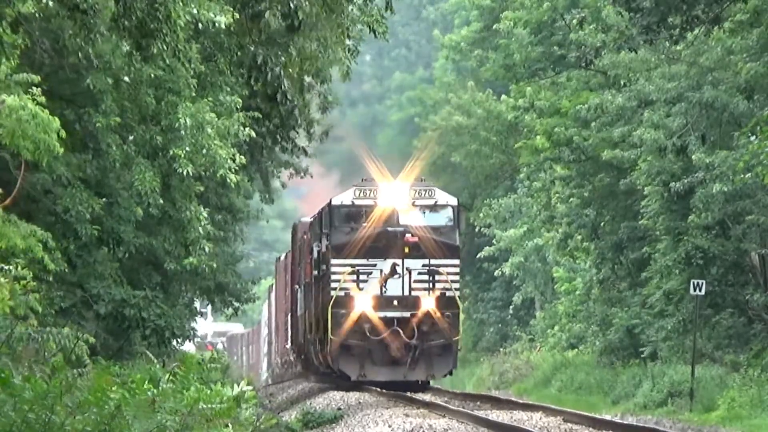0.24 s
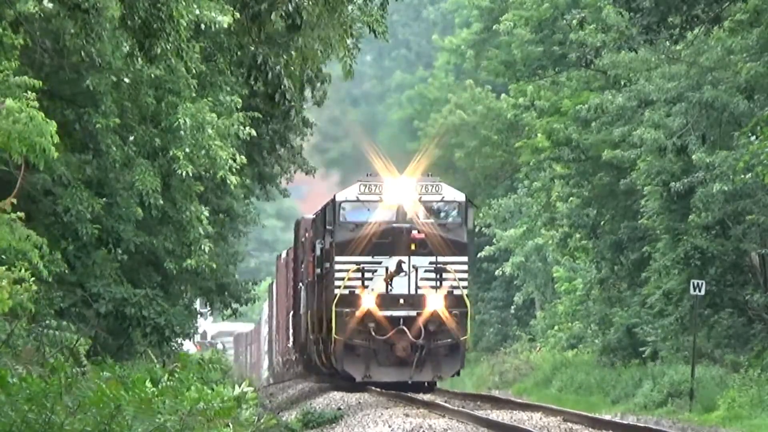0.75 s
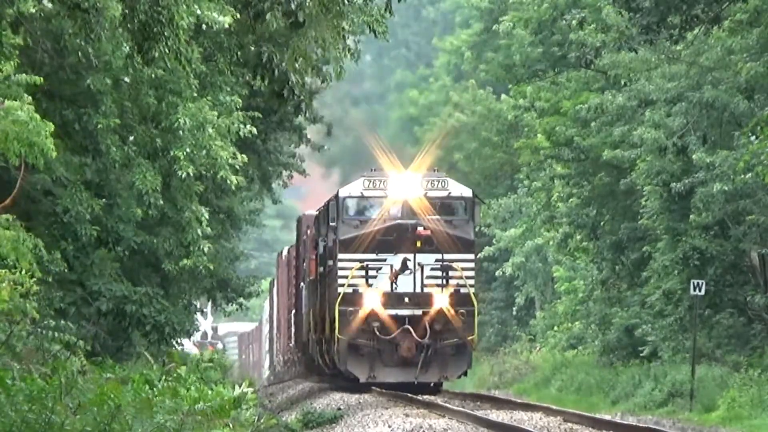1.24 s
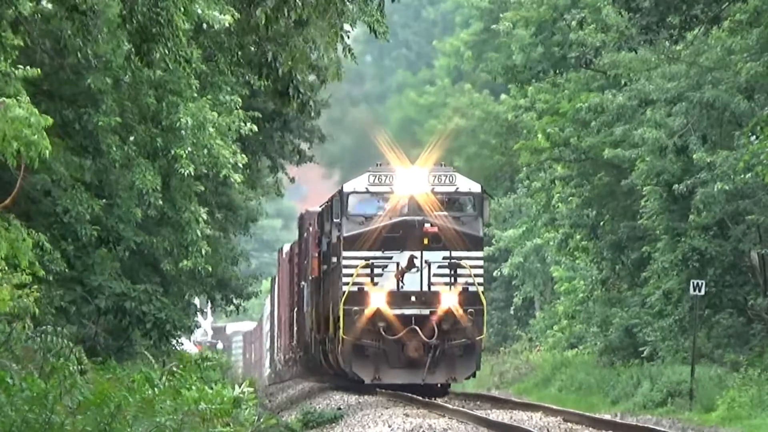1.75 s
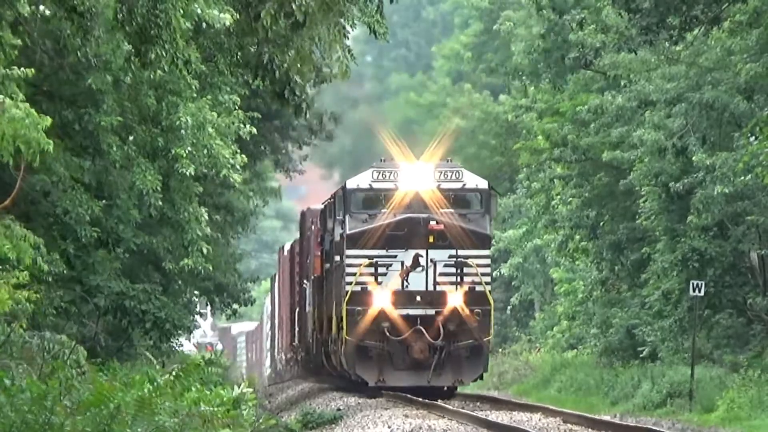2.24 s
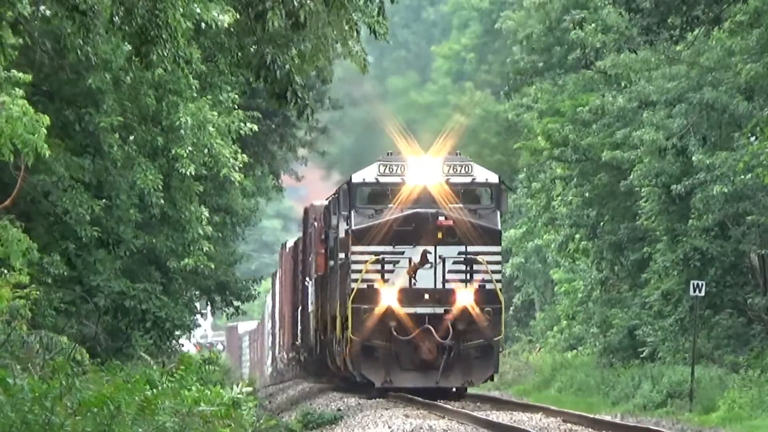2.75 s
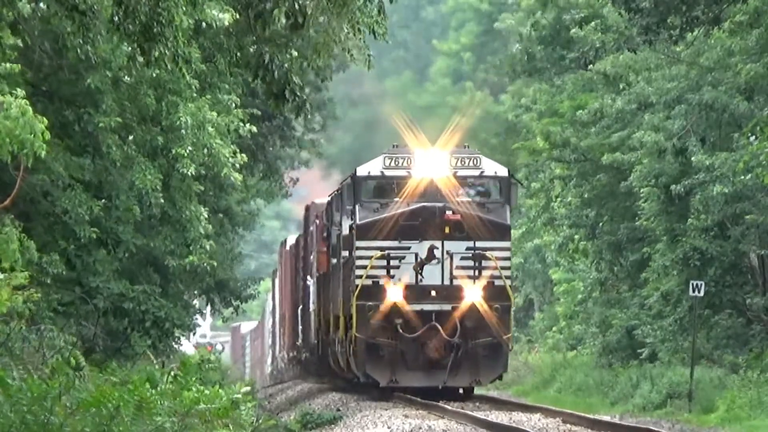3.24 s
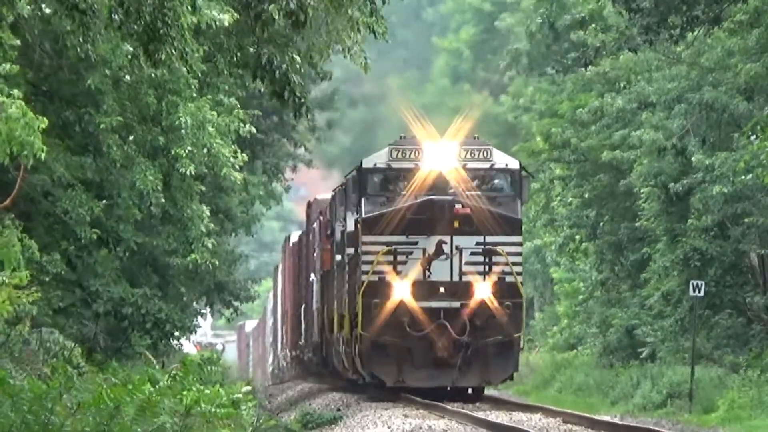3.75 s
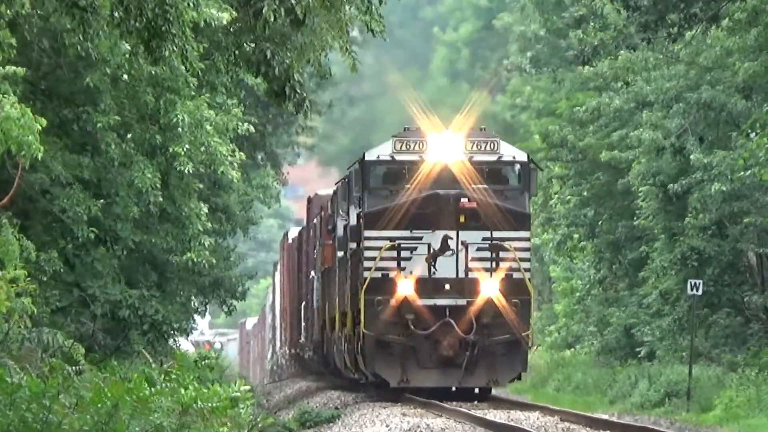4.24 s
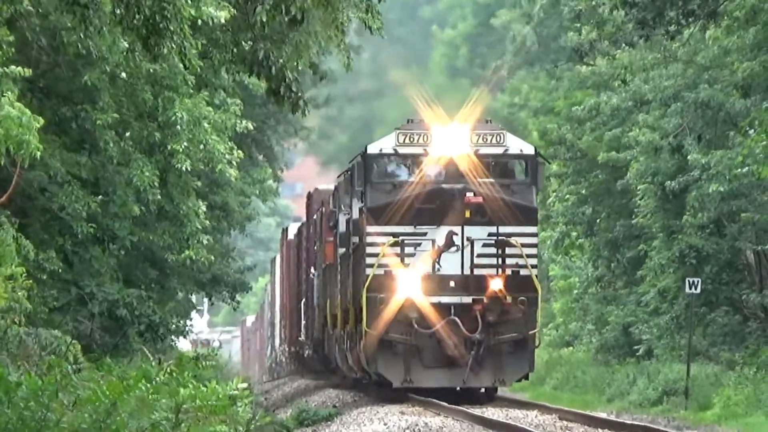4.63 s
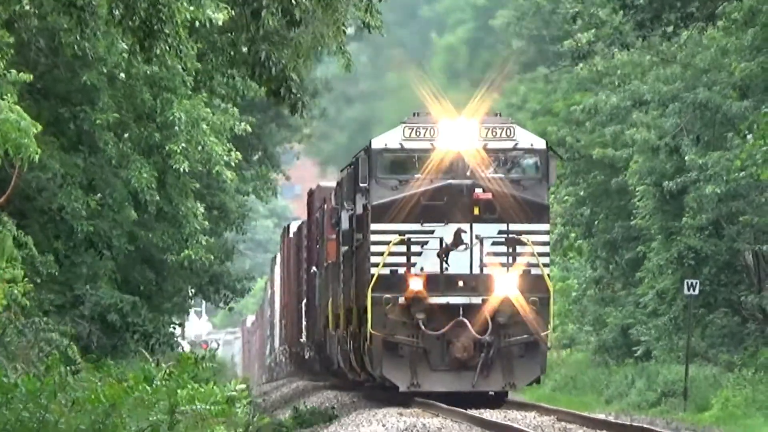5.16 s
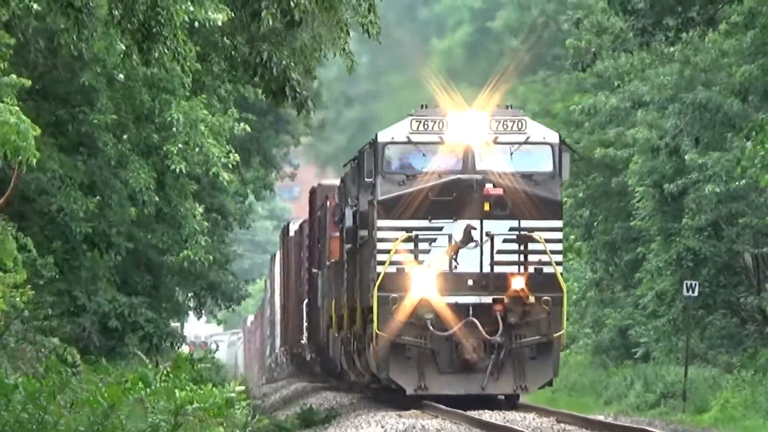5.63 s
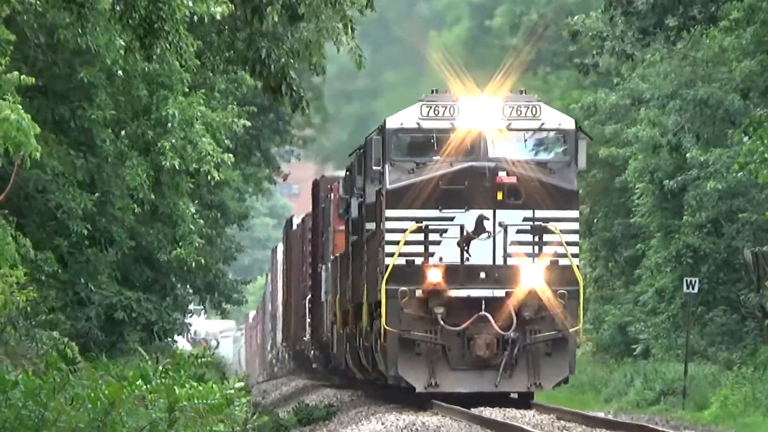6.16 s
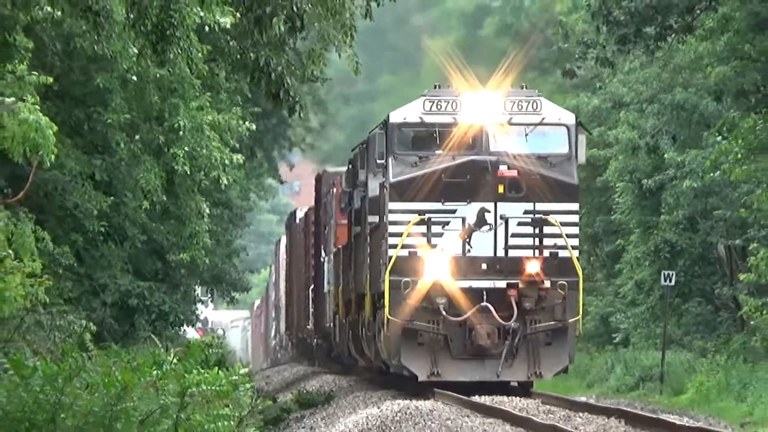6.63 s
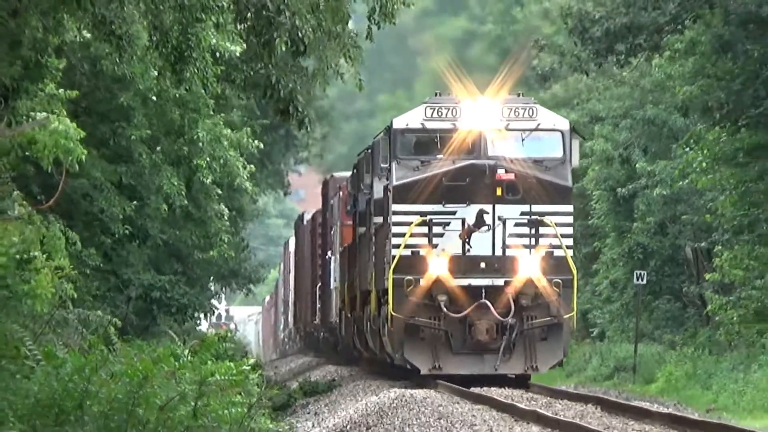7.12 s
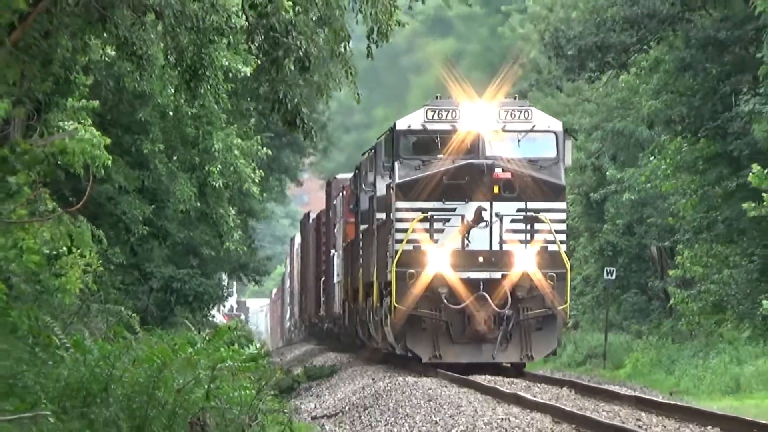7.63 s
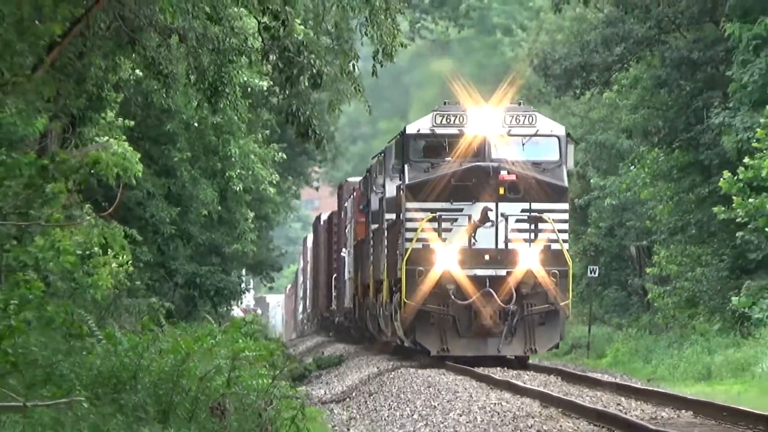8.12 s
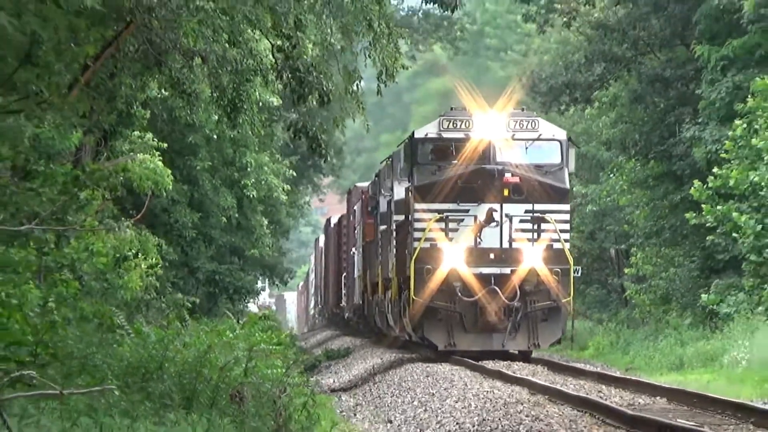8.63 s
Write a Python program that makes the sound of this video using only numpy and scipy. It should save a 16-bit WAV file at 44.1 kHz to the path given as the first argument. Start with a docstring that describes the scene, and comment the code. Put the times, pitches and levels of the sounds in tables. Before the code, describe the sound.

A diesel freight train approaches along a wooded line, its engine throbbing in a deep drone under the roar of exhaust and fans. Early on, a few small birds chirp faintly and an air valve spits twice. The exhaust growl then swells now and then, and about halfway the wheels hiss brighter on the rails. The sound keeps growing louder toward a stereo microphone facing the train.

```python
"""A wooded railway line, a stereo microphone facing a diesel freight train 186 m off and closing.
From the start the loaded engine throbs in a deep drone while its stack and fans roar. In the first
seconds a few small birds call from the trees, and an air valve spits twice. From about 3 s the
exhaust's growl swells now and then. Near 5 s the train comes clear of the trees and the wheels hiss
brighter on the rails; at the end it is about 60 m from the microphone."""
import sys
import numpy as np
from scipy import signal
from scipy.fft import rfft, irfft, next_fast_len
from scipy.io import wavfile
from scipy.ndimage import uniform_filter1d, map_coordinates

SR = 44100
rng = np.random.default_rng(int(sys.argv[2]) if len(sys.argv) > 2 else 0)


def log_audio(samples):
    """Write samples as a 16-bit WAV file to the path given in sys.argv[1]."""
    # one column per channel
    frames = np.atleast_2d(samples).T
    # limit to full scale, then quantise
    limited = np.clip(frames, -1, 1)
    pcm = np.round(limited * 32767).astype(np.int16)
    wavfile.write(sys.argv[1], SR, pcm)


N = 391608

# exhaust lines at orders 5 to 29 of the engine cycle: (level within their range [dB])
EXHAUST_ORDERS = [-26, -17, -45, -24, -12, -17.5, -11, 0, -9, -13.5, 0, -13.5, -41, -16.5, -22.5, -24, -27,
                  -23, -30, -26, -12, -10.5, -3.5, -6.5, -8.5]
# swells of the growl above the drone: (peak time [s], length [s], boost [dB])
GROWL_SWELLS = [(3.3, .65, 7), (4.45, .8, 3), (6.25, 1.0, 5), (7.9, .65, 4.5), (8.65, .5, 2.5)]
# noise of the stack, the fans and the wheels on the rails: (frequency [Hz], relative density [dB])
STACK_SPECTRUM = [(15, -18), (26, -5), (60, 2), (105, 7), (150, -2), (215, 0), (300, -3), (420, -3.5),
                  (540, -3), (720, -9.5), (1100, -19), (2500, -44), (6000, -80)]
FAN_SPECTRUM = [(250, -28), (600, -7.5), (850, -1.5), (1100, -2), (1700, -2.5), (2100, -4.5), (3000, -7.5),
                (4200, -13.5), (5400, -23), (6200, -32), (9000, -50)]
RAIL_SPECTRUM = [(800, -25), (2200, -4.5), (3600, 1.5), (4600, -1), (5500, -3), (6100, -12), (6800, -13),
                 (7600, -11.5), (8200, -15), (9000, -16.5), (10000, -22), (12000, -30.5), (15000, -45)]
# resonances and hollows of the locomotive's body: (centre [Hz], width [Hz], gain [dB])
BODY_RESONANCES = [(532, 23, 2.5), (777, 17, -2), (873, 45, 4.5), (1075, 14, 3), (1130, 34, -3.5),
                   (1360, 120, 3.5), (1528, 38, -4.5), (1753, 84, 3.5)]
# hums of the fans and blowers: (frequency [Hz], relative level [dB])
BLOWER_HUMS = [(264, -14.5), (273, -15.5), (357, -14), (369, -13.5), (857, -19), (907, -16.5),
               (1102, -15.5)]
# air valve spits: (time [s], level [dB], time to fall 60 dB [s])
VALVE_SPITS = [(.926, -51.5, .2), (.988, -54, .26)]
# escaping compressed air: (frequency [Hz], relative density [dB])
VALVE_SPECTRUM = [(2500, -25), (5000, 0), (8000, 0), (11000, -7), (15000, -14)]
# short chirps and one sagging whistle: (time [s], start pitch [Hz], end pitch [Hz], level [dB])
BIRD_CHIRPS = [(.625, 3550, 3300, -47), (.625, 3000, 2520, -45), (.745, 2590, 3100, -45),
               (1.665, 2800, 2480, -44.5), (1.755, 2780, 2400, -43.5), (2.2, 3030, 2750, -46),
               (2.65, 3000, 3020, -44), (3.2, 4640, 4610, -47)]
BIRD_WHISTLE = (1.12, 2440, 2350, -51)
# still air and microphone hiss: (frequency [Hz], relative density [dB])
HISS_SPECTRUM = [(100, 9), (4000, 4.5), (7500, -3.5), (10000, 3), (13000, 1.5), (16000, 0)]
# faint steady whines: (frequency [Hz], level [dB])
FAINT_WHINES = [(7867, -80), (15734, -88)]
# likeness of the roar at the two microphone ports: (frequency [Hz], correlation [0-1])
STEREO_LIKENESS = [(60, 1), (140, 0.95), (250, 0.69), (500, 0.79), (1000, 0.87), (2000, 0.93), (4000, 0.94),
                   (8000, 1)]
# the train's balance at the microphone: (frequency [Hz], left minus right [dB])
LEFT_BALANCE = [(30, -7.2), (95, -6.5), (140, -6.2), (220, -1), (300, -1), (1000, 1.7), (2000, -0.5),
                (4000, 0)]
# the train's phase at the microphone: (frequency [Hz], lead of the left side [rad])
LEFT_LEAD = [(40, -0.12), (100, -0.38), (300, -0.67), (700, -0.62), (1300, -0.28), (2400, 0.25),
             (3500, 0.16), (7000, 0.046)]
# fans and rails on the approach: (start level [dB], growth with nearness [dB/dB], gain in the clear [dB])
FAN_RISE, RAIL_RISE = (-40.5, 1.12, 1.5), (-51.3, 1.12, 6.2)

START_M, SPEED_M_PER_S = 186, 14
CYCLE_HZ = 7.7728
FIRING_DB, THROB_DB, GROWL_DB = -28.6, -28.9, -43.5  # low, middle and high exhaust lines, far off
FIRING_SHARE = .3  # part of each growl swell that the firing note follows
TREBLE_HOLD_DB = 6.3  # fans and rails follow nearness only this far
CLEAR_S, CLEAR_SPREAD_S = 5.08, .24  # the train is halfway clear of the trees at CLEAR_S
CHIRP_S, WHISTLE_S = .066, .46
BAND_LIMIT_HZ = 15760


def exhaust(angle, scatter_db, fade_db):
    """Twelve unequal firings a cycle: orders 12 and 15 beat into a throb, their neighbours into a chug."""
    swell_db = growl_swell_db()
    ranges_db = FIRING_DB + FIRING_SHARE * swell_db, THROB_DB, GROWL_DB + swell_db
    firing, throb, growl = (amp(db + fade_db * wobble(2.5)) for db in ranges_db)
    drone = np.zeros(N)
    for order, db in enumerate(EXHAUST_ORDERS, start=5):
        gain = firing if order < 14 else throb if order < 24 else growl
        # the manifold delays higher orders more, smearing the blows over the cycle
        phase = order * angle - 1.165 * (order - 12) ** 2
        # paths through the trees make every line flutter, the weak ones most for their size
        stray = amp(scatter_db) * amp(db) ** .4
        scattered = stray * (wobble(6) * np.cos(phase) + wobble(6) * np.sin(phase))
        drone += gain * (amp(db) * np.cos(phase) + scattered)
    return amp(nearness_db()) * drone


def engine_angle(hunt_rad):
    """Angle of the engine cycle in radians; the governor hunts a little."""
    return 2 * np.pi * CYCLE_HZ * (clock() - .034) + hunt_rad * wobble(2.5)


def exhaust_puffs(angle, uneven_db):
    """The exhaust leaves in three unequal puffs a cycle, no two cycles quite alike."""
    cycle = .14 * np.cos(angle - .3)
    puffs = .16 * np.cos(3 * (angle - 1.5))
    return (1 + cycle + puffs) * amp(uneven_db * wobble(23))


def growl_swell_db():
    """Each swell of the growl rises and falls as a smooth hump."""
    return sum(db * np.cos(np.pi * np.clip((clock() - peak_s) / length, -.5, .5)) ** 2
               for peak_s, length, db in GROWL_SWELLS)


def roar(angle, stack_db, stack_growth, chug_depth):
    """Stack gas, fans and rolling wheels grow as they near, pulsing slightly with the engine cycle."""
    stack_gain = amp(stack_db + stack_growth * nearness_db() + .42 * wobble(12))
    stack = stack_gain * rush(STACK_SPECTRUM, patchy_db=.5)
    fans = amp(treble_db(*FAN_RISE) + .27 * wobble(14)) * rush(FAN_SPECTRUM, patchy_db=.71)
    rails = amp(treble_db(*RAIL_RISE) + .27 * wobble(9.1)) * rush(RAIL_SPECTRUM, patchy_db=.96)
    return (stack + fans + rails) * (1 + chug_depth * np.cos(angle))


def rush(spectrum, patchy_db):
    """Stereo noise of rms 1, scattered by the trees and fading in patches on its way to the microphone."""
    bins = signal.stft(rng.standard_normal((2, N)), nperseg=512)[2]
    patches = uniform_filter1d(rng.standard_normal(bins.shape[1:]), size=7, axis=0)  # across frequency
    patches = uniform_filter1d(patches, size=16, axis=1)  # across time
    pair = signal.istft(bins * amp(patchy_db * unit(patches)), nperseg=512)[1][:, :N]

    def response(hz):
        colour = amp(along(spectrum, hz) + body_db(hz))
        spread = np.arccos(np.clip(along(STEREO_LIKENESS, hz), -1, 1)) / 2
        return colour * [np.cos(spread), np.sin(spread)]
    mid, side = filtered(pair, response)
    return unit(np.array([mid + side, mid - side]))


def body_db(hz):
    """The ripple that the locomotive's body puts on its roar."""
    return sum(db * np.exp(-.5 * ((hz - centre) / width) ** 2) for centre, width, db in BODY_RESONANCES)


def blowers(trim_db, drift_hz, flutter_db):
    """Fan tones that drift and fade in and out of the roar."""
    hums = sum(amp(db + flutter_db * wobble(5)) * tone(hz + drift_hz * wobble(9))
               for hz, db in BLOWER_HUMS)
    return amp(treble_db(*FAN_RISE) + trim_db) * hums


def nearness_db():
    """Gain since the start: pressure at the microphone grows as one over the train's distance."""
    distance_m = np.maximum(START_M - SPEED_M_PER_S * clock(), 10)
    return 20 * np.log10(START_M / distance_m)


def treble_db(start_db, growth, clear_db):
    """Level of a bright source: it grows as it nears, and steps up once the trees no longer screen it."""
    in_the_clear = 1 / (1 + np.exp((CLEAR_S - clock()) / CLEAR_SPREAD_S))
    return start_db + growth * np.minimum(nearness_db(), TREBLE_HOLD_DB) + clear_db * in_the_clear


def air_valve():
    """Short spits of compressed air, high and thin."""
    envelope = np.zeros(N)
    for start_s, db, t60 in VALVE_SPITS:
        age = np.maximum(clock() - start_s, 0)
        envelope += amp(db - 60 * age / t60) * (1 - np.exp(-age / .002))
    return envelope * coloured_noise(VALVE_SPECTRUM)


def birds(waver):
    """Whistled notes from far off in the trees, each a soft glide."""
    song = np.zeros(N)
    unsteady = 1 + waver * wobble(50)
    notes = [(CHIRP_S, *chirp) for chirp in BIRD_CHIRPS] + [(WHISTLE_S, *BIRD_WHISTLE)]
    for length, start_s, start_hz, end_hz, db in notes:
        progress = np.clip((clock() - start_s) / length, 0, 1)
        hz = (start_hz + (end_hz - start_hz) * progress) * unsteady
        song += amp(db) * np.sin(np.pi * progress) * tone(hz)
    return song


def background(hiss_db):
    """The even hiss of still air and microphone, with two thin whines."""
    whines = sum(amp(db) * np.sqrt(2) * np.sin(2 * np.pi * hz * clock()) for hz, db in FAINT_WHINES)
    return amp(hiss_db) * coloured_noise(HISS_SPECTRUM) + whines


def microphone_ports(x):
    """The bass reaches the right microphone port louder and sooner."""
    sides = np.array([[.5], [-.5]])

    def response(hz):
        pair = amp(sides * along(LEFT_BALANCE, hz)) * np.exp(1j * sides * along(LEFT_LEAD, hz))
        return pair / np.abs(pair.mean(axis=0))
    return filtered(x, response)


def amp(db):
    """Decibels to gain."""
    return 10 ** (np.asarray(db) / 20)


def unit(x):
    """x scaled to rms 1."""
    return x / np.sqrt(np.mean(x ** 2) + 1e-20)


def along(points, hz):
    """A table of (frequency [Hz], value) read on a log axis."""
    frequencies, values = np.transpose(points)
    return np.interp(np.log(hz + 1), np.log(frequencies + 1), values)


def clock():
    """Time of each sample in seconds."""
    return np.arange(N) / SR


def tone(hz):
    """A sine that follows a moving pitch."""
    return np.sin(2 * np.pi * np.cumsum(hz) / SR)


def wobble(rate):
    """A smooth random curve, rate knots a second."""
    coarse = clock()[::SR // 500]
    knots = rng.standard_normal(512)
    return np.interp(clock(), coarse, map_coordinates(knots, [coarse * rate], mode="wrap"))


def filtered(x, response):
    """x times a complex response of frequency."""
    size = next_fast_len(N + SR // 2)
    return irfft(rfft(x, size) * response(np.fft.rfftfreq(size, 1 / SR)), size)[..., :N]


def coloured_noise(spectrum):
    """Mono noise of rms 1 with the given spectrum."""
    return unit(filtered(rng.standard_normal(N), lambda hz: amp(along(spectrum, hz))))


def scene():
    """The train ahead of the microphone, birds and still air around it."""
    angle = engine_angle(hunt_rad=.0072)
    drone = exhaust(angle, scatter_db=-22, fade_db=.3) * exhaust_puffs(angle, uneven_db=.9)
    noise = roar(angle, stack_db=-36.2, stack_growth=.86, chug_depth=.025)
    hums = blowers(trim_db=-1.3, drift_hz=2.485, flutter_db=2)
    train = microphone_ports(drone + noise + hums)
    return train + air_valve() + birds(waver=.01) + background(hiss_db=-58.5)


def record(dry):
    """A 4 ms fade at each end; the recorder keeps nothing above its band limit."""
    fade = np.minimum(clock() / .004, 1)
    return filtered(dry * fade * fade[::-1], lambda hz: hz < BAND_LIMIT_HZ)


dry = scene()
out = record(dry)
log_audio(out)
```